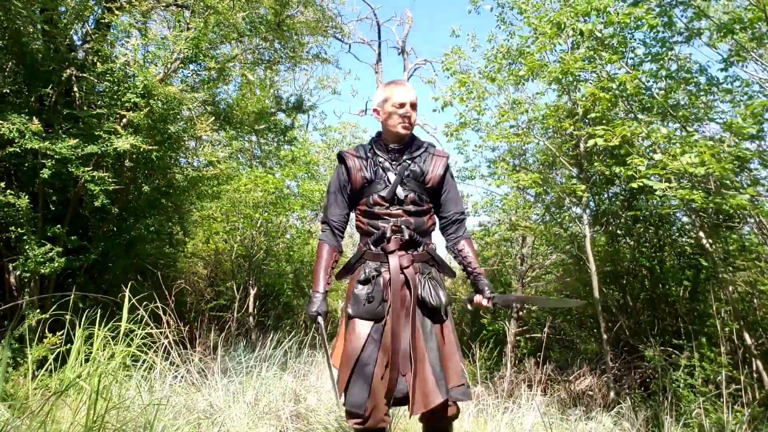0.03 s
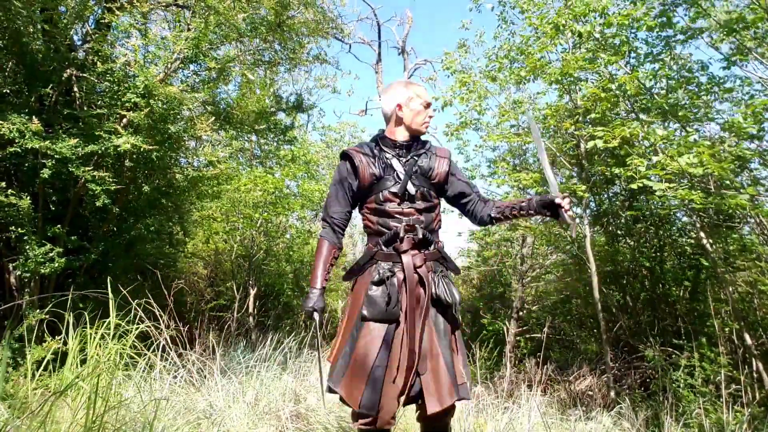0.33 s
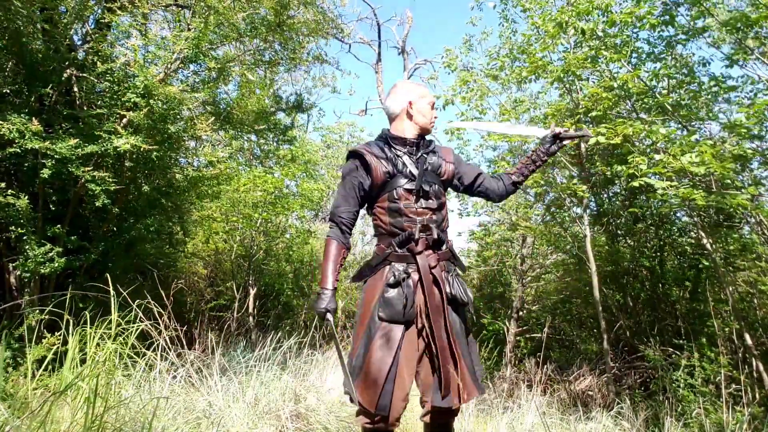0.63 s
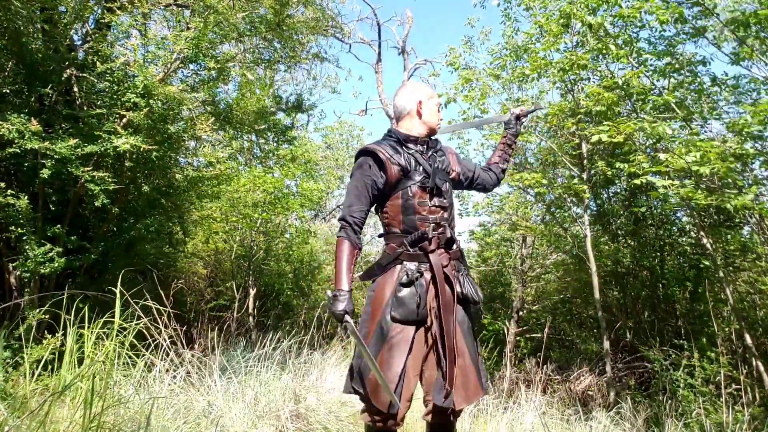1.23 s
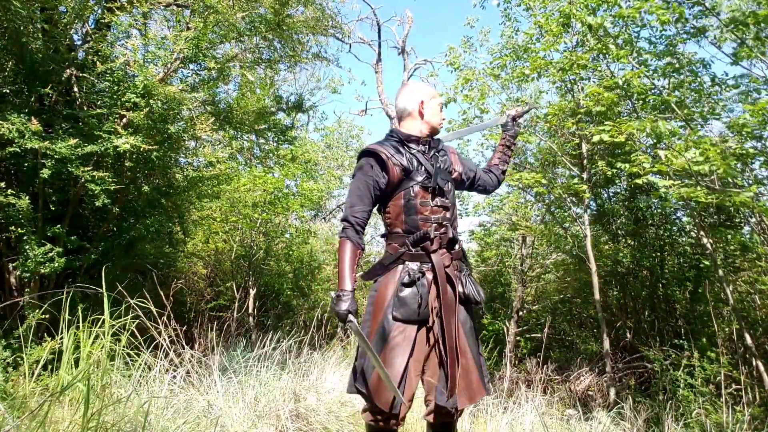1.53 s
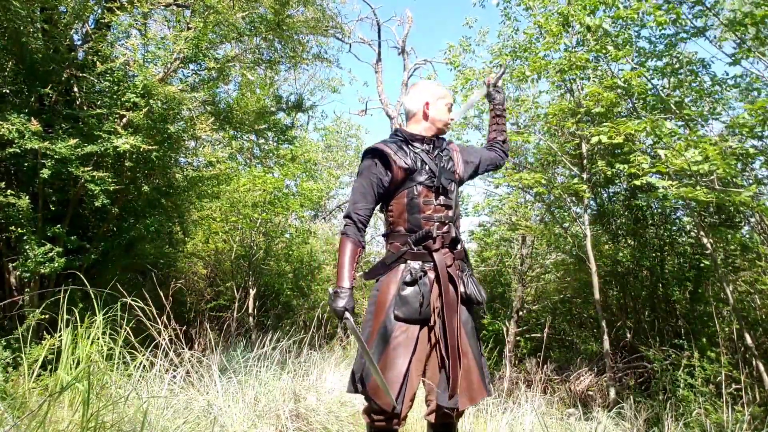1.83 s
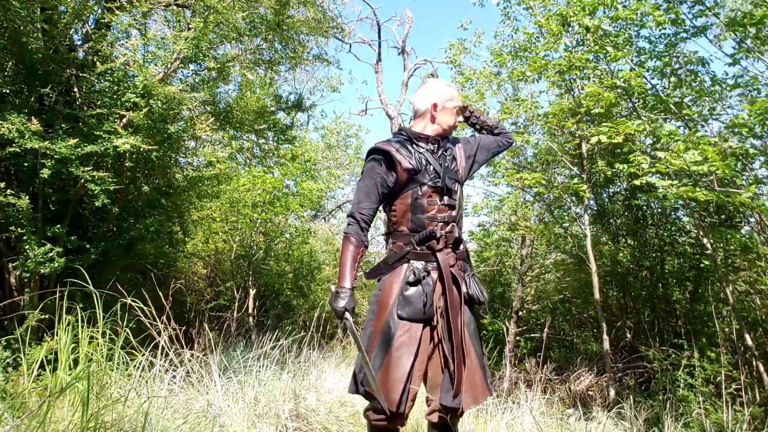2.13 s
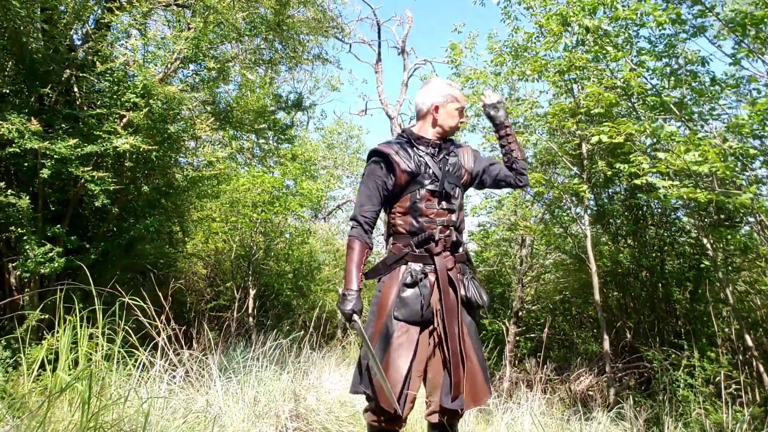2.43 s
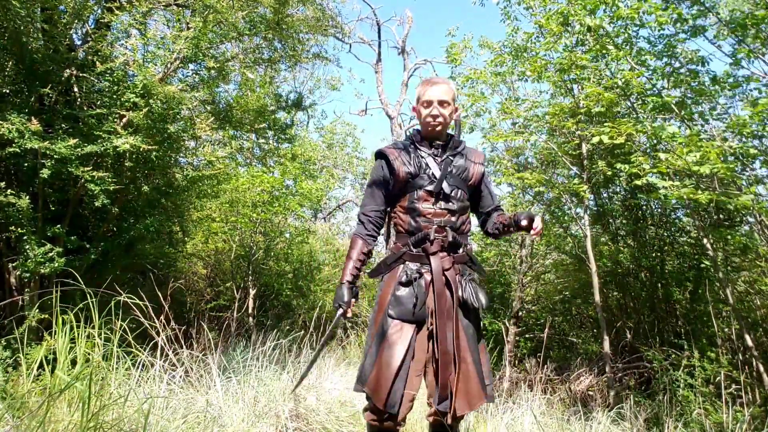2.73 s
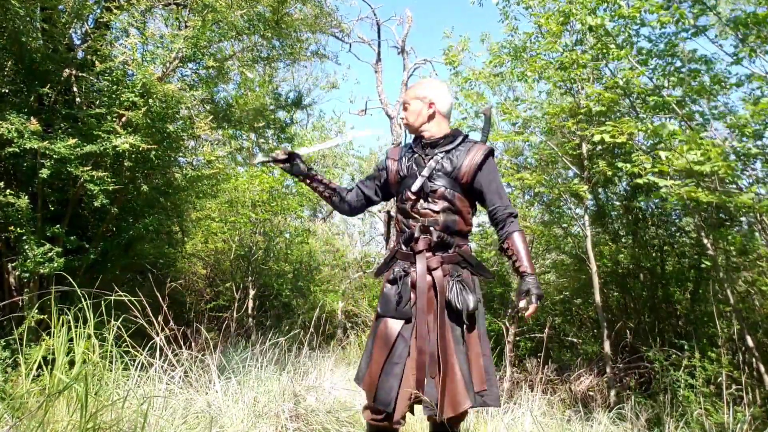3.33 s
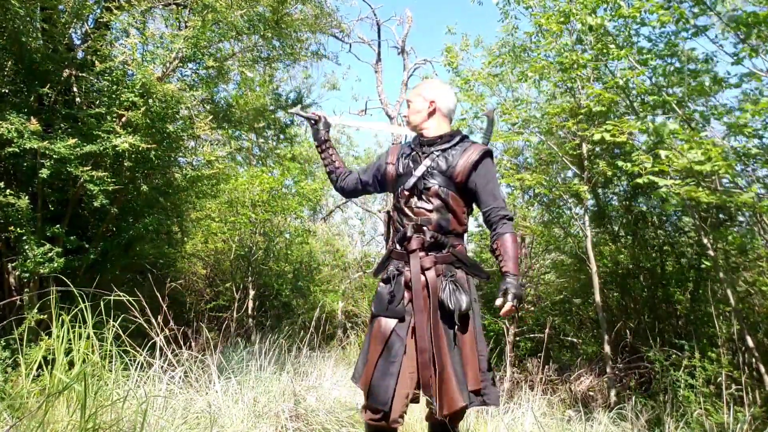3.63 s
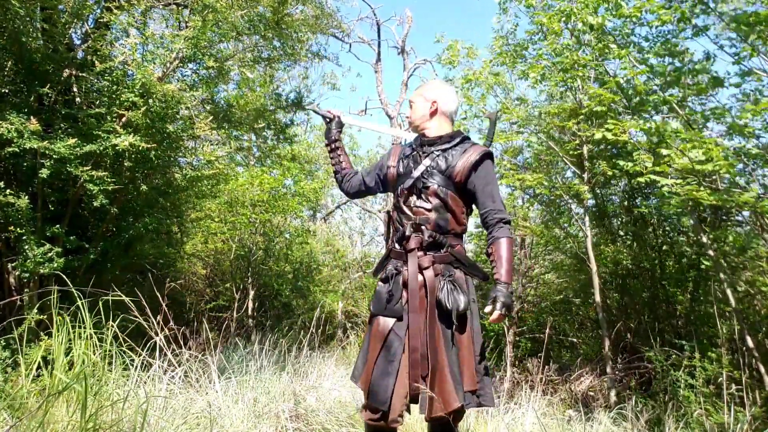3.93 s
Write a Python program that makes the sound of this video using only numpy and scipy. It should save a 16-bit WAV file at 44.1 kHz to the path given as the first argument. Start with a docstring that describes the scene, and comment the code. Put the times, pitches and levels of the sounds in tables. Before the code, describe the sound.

A sword taps its scabbard lightly, then slides in with a brief rasp, a sharp knock and a leathery swish. A second blade ticks at the end. Wind rumbles and leaves rustle faintly around the microphone, a few steps off.

```python
"""A sword is sheathed over the shoulder, a few steps away in a windy forest clearing.
The tip ticks and skids on the scabbard's mouth, stick-slip friction rings the blade as it slides in,
and the guard knocks home with a short leathery swish. A second blade touches its scabbard at the end.
A far bird chirps. Trees scatter blades and bird, over wind rumble, leaf rustle and a fine hiss."""
import sys
import numpy as np
from scipy import signal
from scipy.fft import rfft, irfft
from scipy.io import wavfile
from scipy.ndimage import map_coordinates

SR = 44100
rng = np.random.default_rng(int(sys.argv[2]) if len(sys.argv) > 2 else 0)


def waveform_to_disk(signal):
    """Save audio, clipped to [-1, 1], as 16-bit WAV at the path in sys.argv[1]."""
    frames = np.transpose(np.atleast_2d(signal))
    scaled = np.clip(frames, -1, 1) * 32767
    samples = np.round(scaled).astype(np.int16)
    wavfile.write(sys.argv[1], SR, samples)


N = 176400
T, HZ = np.arange(N) / SR, np.fft.rfftfreq(N, 1 / SR)
EDGE_HZ, TICK_RISE_S, BLADE_PAN_DB = 14620, .0003, 3

# background spectra: f/Hz, relative density/dB
WIND_SPECTRUM = [(12, -50), (20, -30), (36, -11), (50, -2.5), (65, 1), (100, -4), (160, -13), (236, -18.5),
                 (310, -24.5), (400, -34), (700, -45), (2000, -83)]
LEAF_SPECTRUM = [(200, -15), (420, -2), (620, 0.5), (800, 0.5), (1030, -2), (1350, -11.5), (2000, -17),
                 (6000, -23), (12000, -41)]
HISS_SPECTRUM = [(700, -36), (1500, -1.5), (2500, -0.5), (3400, -4), (4000, -1.5), (5000, 1), (6200, 4),
                 (7400, 5.5), (8300, 0), (11000, 2.5), (12800, 2), (13600, 9), (14500, 1)]
SHEEN_SPECTRUM = [(6000, -27), (9000, -6.5), (12500, -2), (14500, -3)]
# background level curves: t/s, level/dB
WIND_LEVEL = [(0, -45), (.6, -43.5), (1.4, -44.5), (2.2, -43.5), (2.7, -44.5), (3.3, -44.5), (3.8, -42.5),
              (4, -44.5)]
LEAF_LEVEL = [(0, -65.5), (.8, -65), (1.4, -65.5), (2.2, -64), (2.7, -66), (3.3, -62.5), (3.65, -62),
              (4, -63.5)]
HISS_LEVEL = [(0, -61.5), (.25, -62.5), (.6, -61.5), (.92, -64), (1.5, -63.5), (2.2, -64), (2.7, -64),
              (2.85, -61.5), (3.15, -61.5), (3.5, -60), (4, -59.5)]
# stereo width: f/Hz, left-right correlation
AIR_CORRELATION = [(30, .97), (120, 0.95), (250, 0.92), (450, 0.49), (900, 0.15), (2000, 0.039),
                   (5000, 0.17), (14000, 0.1)]
SWORD_CORRELATION = [(400, 0.95), (2000, 0.24), (4000, 0.23), (7000, -0.16), (14000, -0.058)]
# stereo balance: f/Hz, left-right/dB
AIR_BALANCE = [(60, -1.5), (200, 0), (700, -1.5), (1300, 1.5), (2000, 2.5), (4200, 2), (5200, 5),
               (6300, 10), (7300, 12), (8200, 3), (10800, 2), (12200, -4.5), (14500, 1)]
SWORD_BALANCE = [(500, 2), (2500, 3), (4500, 0), (6800, 4), (9000, 0.5), (11000, 0), (14000, -6.5)]
# decay of the scatter from the trees: f/Hz, t60/s
TREE_DECAY = [(300, 0.52), (1200, 0.41), (3000, 0.44), (7000, 0.38), (14000, 0.26)]
# bird chirps: t/s, level/dB
BIRD_CHIRPS = [(3.158, -75), (3.403, -74), (3.878, -75)]
# steel touching scabbard mouth and harness fittings: t/s, relative level/dB, left-right/dB
STEEL_TICKS = [(.0335, -44, 3), (1.5715, -32.5, 2.5), (1.612, -46.5, 0), (2.346, -43, 1), (2.3529, -37, -2),
               (2.8226, -50, 3), (2.9986, -49, 3), (3.985, -38.5, 4)]
# tone of the ticks: f/Hz, gain/dB
TICK_FILTER = [(500, -16), (1600, -6), (3300, -3), (4500, -4.5), (6000, 3), (7200, 3.5), (8300, 3.5),
               (11000, 4.5), (14000, 1.5)]
# sword knocking on scabbard: t/s, level/dB, f/Hz, t60/s
SCABBARD_KNOCKS = [(1.6115, -55, 1250, .016), (2.2753, -44, 900, 0.0096), (2.347, -40, 1000, .009),
                   (2.3518, -37.5, 2120, 0.024), (2.3546, -24, 1620, 0.0052), (2.3569, -27.7, 1154, 0.011),
                   (2.3587, -34, 1140, 0.0042), (2.3652, -43, 1600, .012), (2.3738, -38, 1220, 0.022),
                   (2.379, -39.5, 1220, .015), (3.985, -48, 1250, .02)]
# modes: f/Hz, relative level/dB, t60/s
FREE_BLADE_MODES = [(2800, -12, .7), (3620, -10, .35), (5254, -5, .3), (7010, -3, .3), (7250, 3, .12),
                    (7897, -5, .3)]  # first blade in the open
DAMPED_BLADE_MODES = [(1160, 7, 0.014), (2170, 1.5, 0.021), (3000, -7, .033), (3800, -12, 0.03),
                      (4350, -10, 0.025), (4900, -13, .025), (5680, -12, .04), (6360, -12, 0.03),
                      (7180, -12, .04)]  # first blade in the scabbard
SECOND_BLADE_MODES = [(980, -2, 0.093), (2880, -12, .2), (3950, -12, .13), (4530, -9, .16), (5460, -12, .1),
                      (6691, 0.5, .06), (7340, -7, .06), (7820, 1, .11), (9100, -7, .05)]
SCABBARD_MODES = [(520, 1, 0.079), (790, -1.5, 0.039), (970, 1, 0.05), (2890, 0, .03)]
# contact noise spectra: f/Hz, relative density/dB
SKID_SPECTRUM = [(500, -10), (1100, 3), (1600, -3), (3000, 0), (4300, -4), (6000, -2), (7200, 4),
                 (8500, -3), (14500, -2)]  # tip on rim
RASP_SPECTRUM = [(300, -13), (900, -7), (1900, 0), (2800, -1), (3500, -4), (4500, -1), (7500, -2),
                 (9500, -8), (14500, -6.5)]  # blade along scabbard
SWISH_SPECTRUM = [(250, -13), (450, 1), (1200, -6), (2000, -4.5), (2800, -3), (4100, -5), (5700, 0.5),
                  (7700, 0), (10000, -1), (12000, -1), (14500, -4)]  # blade wedging into leather
ZING_SPECTRUM = [(11000, -33), (11800, 2), (12200, 0), (12900, -30)]  # steel at the tightest rub
SNAP_SPECTRUM = [(3000, -12), (5000, -5), (8500, -7), (9800, 0), (11200, 1), (12600, -4), (14500, 0)]  # guard on rim
CRUNCH_SPECTRUM = [(250, -14), (480, 0), (700, -1), (950, .5), (1700, -1), (2500, -5), (4000, -9),
                   (8000, -30)]  # leather under guard


def amp(db):
    """Decibels to gain."""
    return 10 ** (np.asarray(db) / 20)


def unit(x):
    """Scale to rms 1."""
    return x / np.sqrt(np.mean(x ** 2) + 1e-20)


def read(table, hz):
    """Interpolate on a log-frequency axis."""
    table_hz, value = np.transpose(table)
    return np.interp(np.log(hz + 1), np.log(table_hz + 1), value)


def pan(db):
    """Left and right gains for a level difference."""
    return amp(np.array([[.5], [-.5]]) * db)


def envelope(start_s, rise_s, hold_s, t60_s):
    """Linear attack; exponential release from hold_s after the start."""
    t = T - start_s
    return np.clip(t / rise_s, 0, 1) * amp(-60 * np.maximum(t - hold_s, 0) / t60_s)


def noise():
    """White noise, two independent channels."""
    return rng.standard_normal((2, N))


def colour(pair, spectrum, correlation=SWORD_CORRELATION, pan_db=read(SWORD_BALANCE, HZ)):
    """Give two independent signals a spectrum, correlation and balance; rms 1."""
    left, other = rfft(pair)
    c = np.clip(read(correlation, HZ), -1, 1)
    right = c * left + np.sqrt(1 - c ** 2) * other
    return unit(irfft(np.array([left, right]) * amp(read(spectrum, HZ)) * pan(pan_db), N))


def air(spectrum, level_db, waver_db):
    """Continuous noise, level wavering at 1-20 Hz."""
    waver = sum(np.sin(2 * np.pi * (hz * T + rng.random())) / np.sqrt(hz)
                for hz in np.geomspace(1, 20, 20))
    steady = colour(noise(), spectrum, AIR_CORRELATION, read(AIR_BALANCE, HZ))
    return steady * amp(level_db + waver_db * unit(waver))


def wind():
    """Low rumble, swelling with the gusts."""
    return air(WIND_SPECTRUM, np.interp(T, *np.transpose(WIND_LEVEL)), waver_db=.81)


def leaves():
    """Midrange rustle of foliage."""
    return air(LEAF_SPECTRUM, np.interp(T, *np.transpose(LEAF_LEVEL)), waver_db=.5)


def hiss():
    """Fine hiss, briefly brighter at the start."""
    bed = air(HISS_SPECTRUM, np.interp(T, *np.transpose(HISS_LEVEL)), waver_db=.3)
    sheen = air(SHEEN_SPECTRUM, level_db=-61.5, waver_db=3)
    return bed + sheen * envelope(0, rise_s=.02, hold_s=.22, t60_s=.17)


def scatter(x, decay):
    """Many weak reflections, each band decaying at its own rate."""
    hz, t, bands = signal.stft(rng.standard_normal((2, SR)), SR, nperseg=256)
    tail = signal.istft(bands * amp(-60 * t / read(decay, hz)[:, None]), SR, nperseg=256)[1]
    return signal.fftconvolve(x, tail / np.linalg.norm(tail[0]), axes=1)[:, :N]


def bird(length_s=.061, start_hz=3650, sweep_hz_per_s=20000):
    """Faint rising whistles from the trees."""
    out = np.zeros(N)
    for start_s, db in BIRD_CHIRPS:
        t = np.clip(T - start_s, 0, length_s)
        swell = np.sin(np.pi * (t / length_s) ** .7)
        out += amp(db) * swell * np.sin(2 * np.pi * (start_hz + sweep_hz_per_s * t / 2) * t)
    return out


def slips(rate_per_s=2000, spread_db=1.8):
    """Stick-slip friction: dense clicks of uneven size, two channels."""
    size = amp(spread_db * np.minimum(rng.exponential(1, (2, N)), 3))
    return unit(size * noise() * (rng.random((2, N)) < rate_per_s / SR))


def ring(modes):
    """Decaying modes; left-right phase spread grows with frequency."""
    t = T[:SR // 2]
    out = np.zeros((2, len(t)))
    for hz, db, t60_s in modes:
        offset_cycles = rng.random((2, 1)) * min(hz / EDGE_HZ, 1)
        out += amp(db - 60 * t / t60_s) * np.sin(2 * np.pi * (hz * t + offset_cycles))
    return out


def struck(modes, start_s, level_db, pan_db):
    """Blade or scabbard rung by one touch."""
    delayed = np.pad(ring(modes), ((0, 0), (round(start_s * SR), N)))[:, :N]
    return delayed * amp(level_db) * pan(pan_db)


def ticks(near_t60_s=.22):
    """Bright bursts of steel contact, scattered by nearby grass and leaves."""
    out = np.zeros((2, N))
    for start_s, db, pan_db in STEEL_TICKS:
        burst = noise() * envelope(start_s, TICK_RISE_S, TICK_RISE_S, t60_s=.005)
        out += .5 * amp(db) * pan(pan_db) * burst
    out += scatter(out, [(EDGE_HZ, near_t60_s)])
    return irfft(rfft(out) * amp(read(TICK_FILTER, HZ)) * pan(read(SWORD_BALANCE, HZ)), N)


def skid(level_db=-61):
    """The tip scrapes lightly round the scabbard's mouth."""
    scrape = colour(slips(), SKID_SPECTRUM)
    return amp(level_db) * scrape * envelope(1.569, rise_s=.003, hold_s=.02, t60_s=.45)


def squeak(hz=5750, level_db=-57.5):
    """One blade mode sings briefly on entry."""
    tone = np.sin(2 * np.pi * hz * T) * envelope(2.276, rise_s=.0039, hold_s=.009, t60_s=.04)
    return amp(level_db) * tone * pan(BLADE_PAN_DB)


def slide(start_s=2.262, home_s=2.362, level_db=-55, swell_db=3, bend_hz=25, bend_depth=.0072):
    """Friction rasps and rings the blade under a firming push; the shifting grip bends its modes."""
    rates_hz = np.geomspace(bend_hz / 2, bend_hz * 2, 10)
    bend = unit(sum(np.sin(2 * np.pi * (hz * T + rng.random())) for hz in rates_hz))
    position_samples = np.cumsum(1 + bend_depth * bend)
    ringing = unit(signal.fftconvolve(slips(), ring(DAMPED_BLADE_MODES), axes=1)[:, :N])
    singing = np.array([map_coordinates(side, [position_samples], order=3) for side in ringing])
    rasp = colour(slips(), RASP_SPECTRUM)
    push = amp(level_db + np.interp(T, [start_s, home_s], [-swell_db / 2, swell_db / 2]))
    contact = envelope(start_s, rise_s=.02, hold_s=home_s - start_s, t60_s=.18)
    return (singing * pan(BLADE_PAN_DB) + rasp) * push * contact


def knocks(rise_s=.0005, right_lag_s=.00007, overtone_ratio=1.82, overtone_db=-13, pan_db=2.5):
    """The sword chatters on the scabbard: short hollow knocks."""
    out = np.zeros((2, N))
    for start_s, db, hz, t60_s in SCABBARD_KNOCKS:
        phase = 2 * np.pi * hz * np.array([T - start_s, T - start_s - right_lag_s])
        tone = np.sin(phase) + amp(overtone_db) * np.sin(overtone_ratio * phase)
        out += amp(db) * tone * envelope(start_s, rise_s, rise_s, t60_s)
    return out * pan(pan_db)


def guard(snap_db=-35, crunch_db=-46):
    """The guard lands: steel snaps on the rim, leather crunches under it."""
    snap = colour(noise(), SNAP_SPECTRUM, pan_db=0)
    snap *= envelope(2.3532, TICK_RISE_S, TICK_RISE_S, t60_s=.012)
    crunch = colour(noise() + slips(), CRUNCH_SPECTRUM, pan_db=0)
    crunch *= envelope(2.346, rise_s=.006, hold_s=.006, t60_s=.2)
    return amp(snap_db) * snap + amp(crunch_db) * crunch


def swish(rub_db=-42.2, zing_db=-50, grain=.73):
    """The blade wedges into the leather: a bright rub with a thin steel zing."""
    rub = colour(noise() + grain * slips(), SWISH_SPECTRUM)
    rub *= envelope(2.35, rise_s=.0089, hold_s=.028, t60_s=.15)
    zing = colour(slips(), ZING_SPECTRUM)
    zing *= envelope(2.355, rise_s=.004, hold_s=.016, t60_s=.05)
    return amp(rub_db) * rub + amp(zing_db) * zing


def scene(trees_db=-13):
    """Blades and bird among the trees, over wind, leaves and hiss."""
    direct = ticks() + skid()
    direct += struck(FREE_BLADE_MODES, start_s=1.5718, level_db=-64, pan_db=3)
    direct += squeak() + slide() + knocks() + guard() + swish()
    direct += struck(SCABBARD_MODES, start_s=2.3535, level_db=-48, pan_db=1)
    direct += struck(SECOND_BLADE_MODES, start_s=3.985, level_db=-53.5, pan_db=8)
    direct += bird()
    background = wind() + leaves() + hiss()
    return background + direct + amp(trees_db) * scatter(direct, TREE_DECAY)


def record(dry):
    """Steep low-pass at EDGE_HZ."""
    lowpass = signal.firwin(2047, EDGE_HZ, window=("kaiser", 8), fs=SR)
    return signal.oaconvolve(dry, lowpass[None], "same")


dry = scene()
out = record(dry)
waveform_to_disk(out)
```